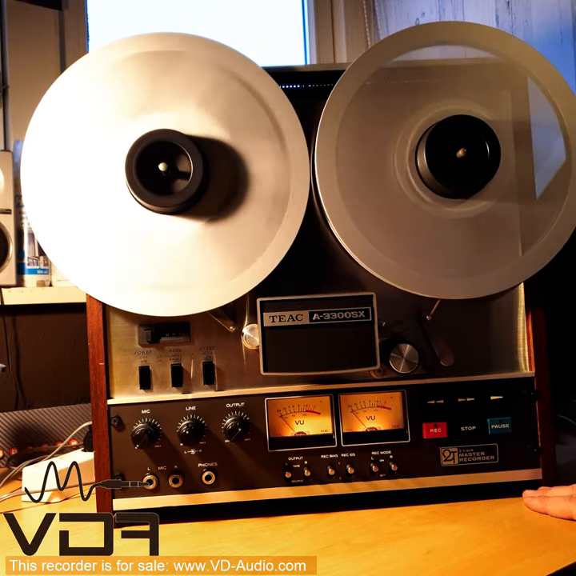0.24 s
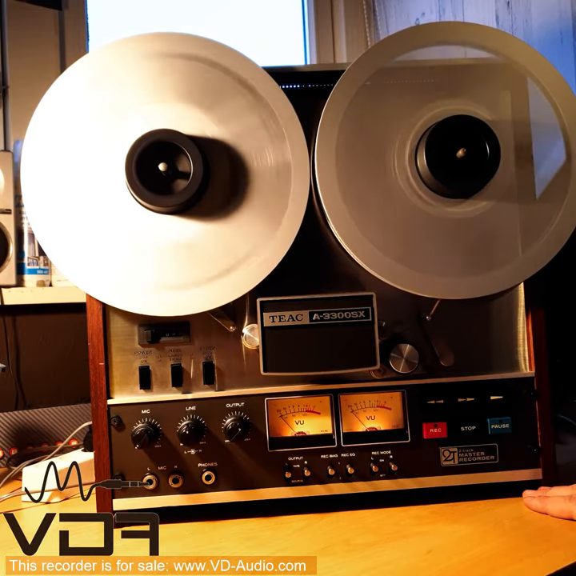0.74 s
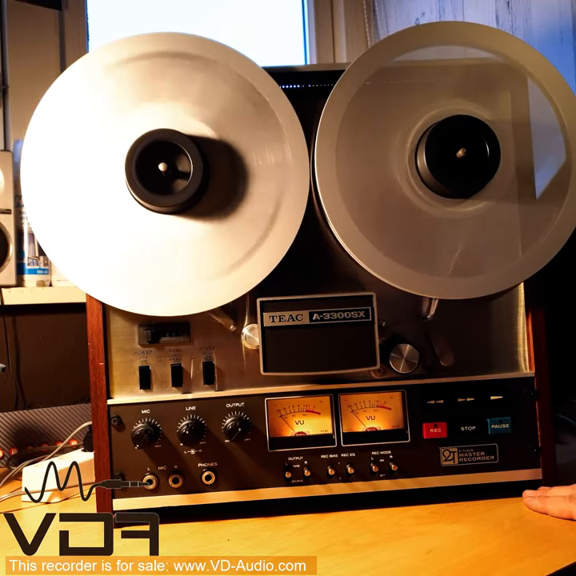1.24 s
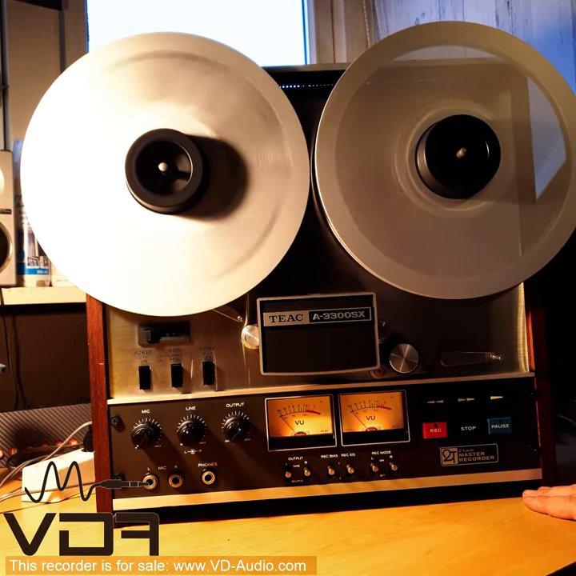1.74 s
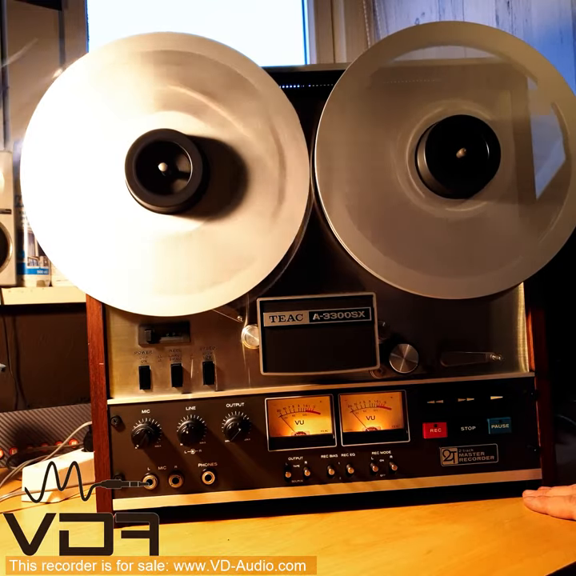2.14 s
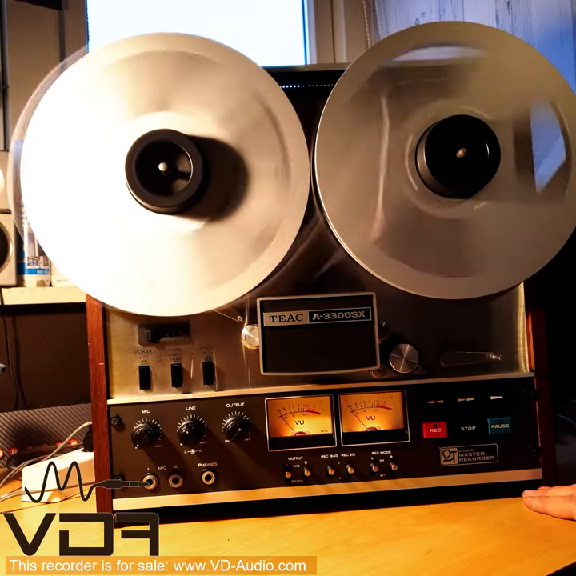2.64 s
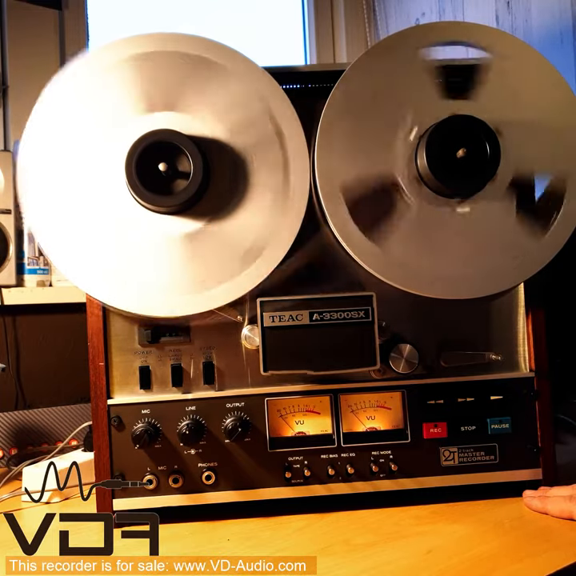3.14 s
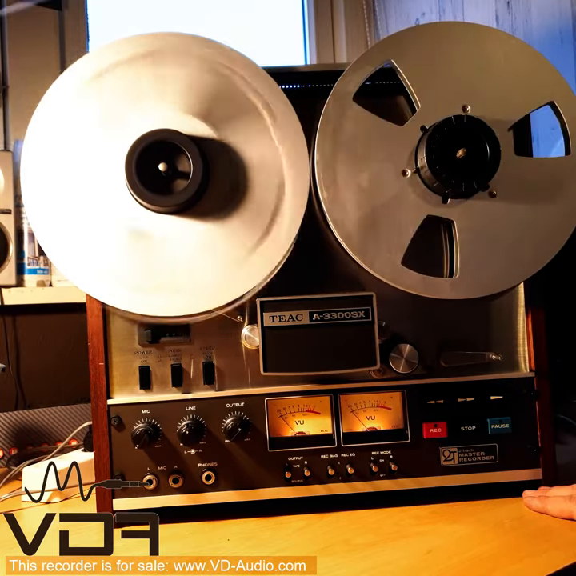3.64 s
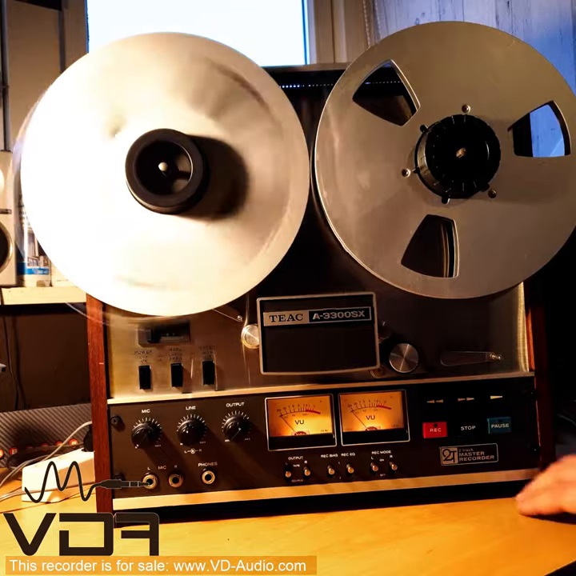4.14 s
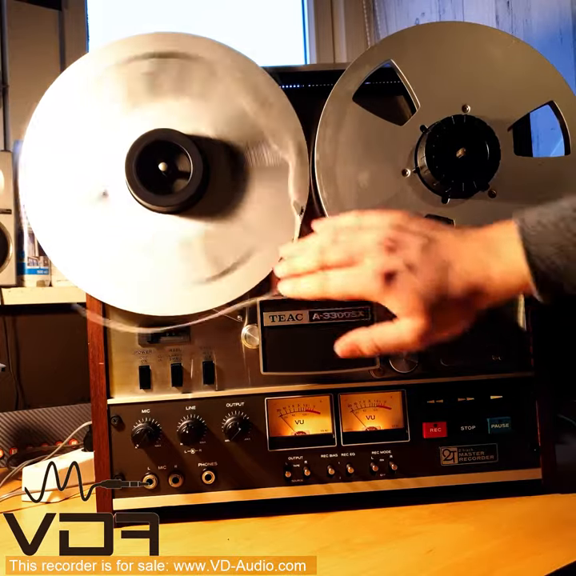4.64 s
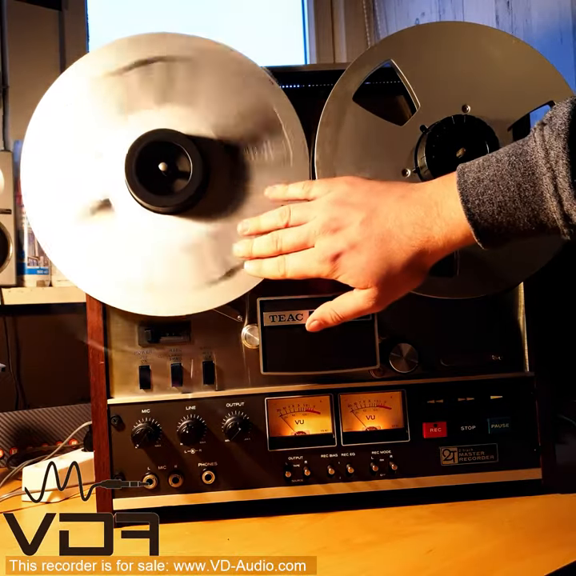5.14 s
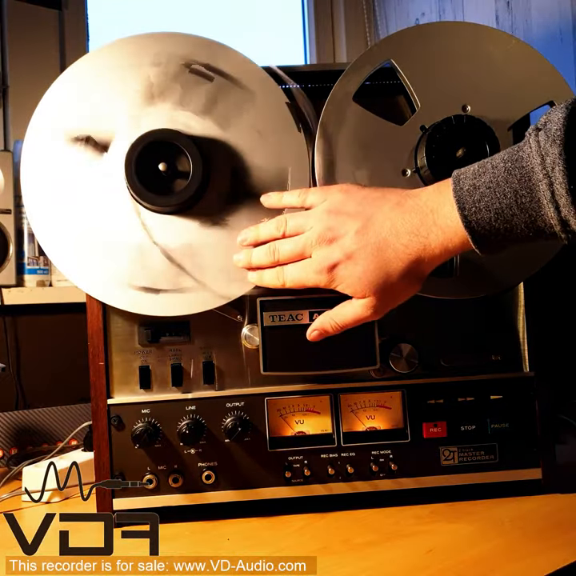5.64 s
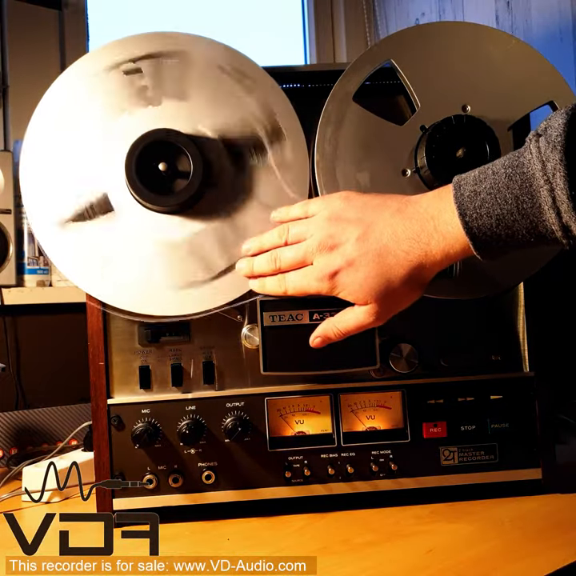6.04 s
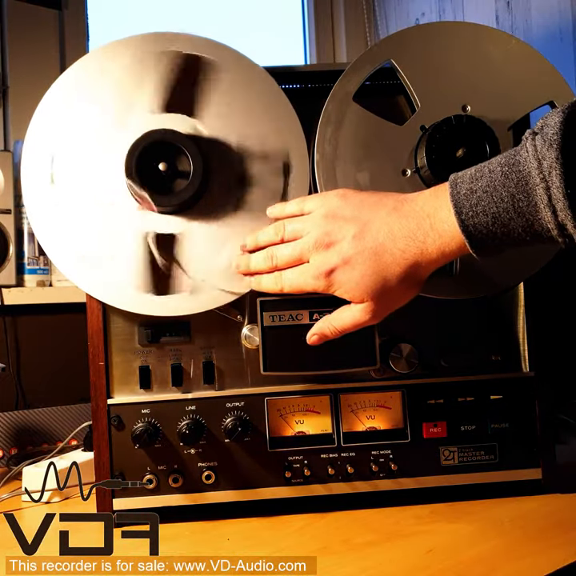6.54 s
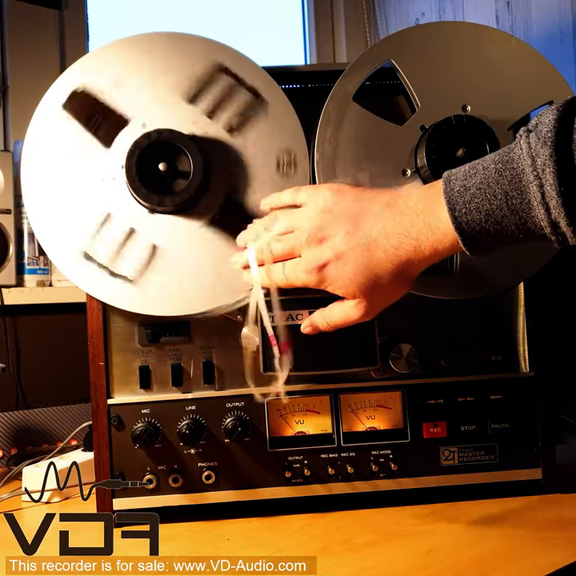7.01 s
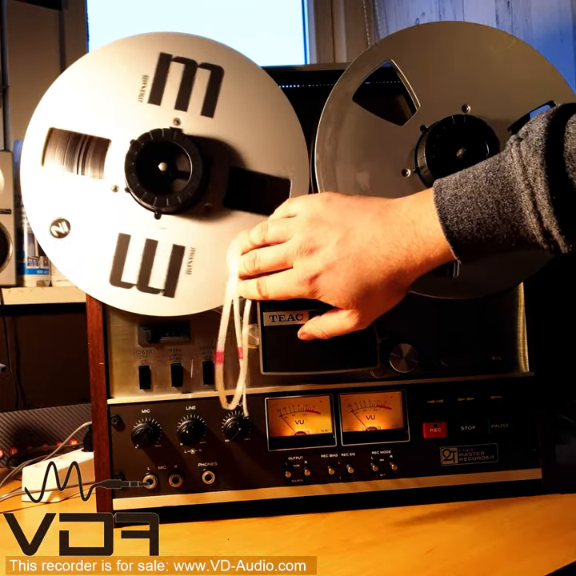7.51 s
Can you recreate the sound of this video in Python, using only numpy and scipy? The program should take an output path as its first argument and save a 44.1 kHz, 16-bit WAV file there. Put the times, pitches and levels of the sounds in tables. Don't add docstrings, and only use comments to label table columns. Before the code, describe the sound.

Close to the microphone in a small quiet room, a tape deck rewinds with a steady low motor hum, a mid-range bearing whirr and light tape hiss. Around 1.2 seconds the hiss swells, and at 1.3 the tape runs off: a rapid volley of bright, crackling plastic snaps, with short metallic clacks and hollow wooden thuds to about 1.75. The motor drops in pitch and fades by 2.5 while the case shudders; one especially hard, sharp crack lands at 2.04. From 2.5 to 4.6 the loose end flaps irregularly, in clusters of dry slaps, ticks and rustling swishes, with a faint ring from the reel and a low bump near 4.0. From about 5 softer pats come a few tenths of a second apart. Fingers hiss lightly on the rim from 5.4 to 7.6, with a faint rubbing, singing squeak near 6.5 and 7.5, then quiet room air.

```python
import sys
import numpy as np
from scipy import signal
from scipy.fft import rfft, irfft, next_fast_len
from scipy.io import wavfile
from scipy.ndimage import uniform_filter1d, map_coordinates

SR = 44100
rng = np.random.default_rng(int(sys.argv[2]) if len(sys.argv) > 2 else 0)


def undo_db(level):
    steps = np.asarray(level, float) / 20
    return 10 ** steps


def file_out(sig):
    cols = np.atleast_2d(sig).T
    lim = np.clip(cols, -1, 1)
    pcm = np.round(lim * 32767).astype(np.int16)
    wavfile.write(sys.argv[1], SR, pcm)


N = 342657
T = np.arange(N) / SR

# (time [s], bearing whirr level [dB], tape hiss level [dB])
DRIVE = [
    (0.0, -49, -58),
    (0.806, -49, -56.5),
    (1.3, -47.5, -46),
    (1.6, -48, -67.5),
    (2.0, -55.5, -67.5),
    (2.5, -70, -93),
    (3.0, -110, -110),
]
# (time [s], shaft rate [Hz], level [dB])
HUM = [
    (0, 64.45, -64),
    (1.3, 65.4, -63.5),
    (1.5, 63, -66.5),
    (1.8, 58.3, -61.5),
    (2.05, 55, -71),
    (2.4, 49.9, -89),
]
# (multiple of the shaft rate [1], level [dB])
SHAFT_ORDERS = [(1, 5), (2, 0), (5, -11.5), (8, -15.5)]
# (frequency [Hz], density [dB per Hz])
WHIRR = [(24, -37), (40, -0.5), (68, -7), (96, -9), (129, -10.5), (166, -14), (326, -10.5), (419, -14.5),
         (506, -13), (611, -11), (1600, -2.5), (3860, -22), (6000, -43), (7800, -59.5), (13200, -120)]
# (frequency [Hz], width [Hz], gain [dB])
CHASSIS = [(320, 44, 3), (517, 36, 4.5), (1170, 60, 1.5), (1290, 60, 1), (1440, 50, -4), (1527, 60, 0.5),
           (2090, 50, -8.5)]
# (frequency [Hz], density [dB per Hz])
TAPE_HISS = [(1760, -47.5), (3000, -13), (3820, -14.5), (4940, -11), (7010, -14.5), (13200, -4.5),
             (16000, -15), (16500, -41)]

# (frequency [Hz], density [dB per Hz])
AIR = [(15, -40), (28, -8.5), (50, -1), (97, -9), (154, -14), (208, -14.5), (389, -31.5), (422, -27.5),
       (457, -24.5), (787, -31), (12900, -40.5), (16500, -32.5)]
# (frequency [Hz], correlation [1])
ALIKE = [(100, 0.88), (300, 0.82), (600, 0.53), (2000, 0.13), (12000, 0.072)]
# (frequency [Hz], t60 [s])
ROOM = [(150, 0.65), (1000, 0.22), (5000, 0.28), (14000, 0.057)]

# (frequency [Hz], density [dB per Hz])
FIZZ = [(7000, -56), (9000, -5.5), (13000, -2), (15500, -4), (16600, -51)]
# (frequency [Hz], density [dB per Hz])
FILM = [(1470, -36.5), (2500, -14), (2830, -2.5), (3310, -9.5), (6180, 1), (9500, -5), (12400, -2.5),
        (20900, -120)]
# (frequency [Hz], density [dB per Hz])
PLATE = [(180, -39.5), (300, -11.5), (494, -20.5), (527, -20), (754, -4), (1430, -4), (1570, -2.5),
         (1960, 1), (4000, 0), (5200, -4), (8800, -120)]
# (frequency [Hz], width [Hz], gain [dB])
FLANGE = [(857, 89, 0.5), (1393, 160, 7), (1710, 16, 6), (2190, 94, 5.5), (2950, 150, 0.5), (3370, 46, 6),
          (4280, 62, 0.5), (6300, 120, 0.5), (7700, 1000, 3)]
ECHO_T60 = 0.17, 0.25, 0.3
# (time [s], peak [dB], plate [dB], fizz [dB], echo [dB])
LASHES = [(1.3144, -26.5, -16.5, -1, 2), (1.328, -31.5, -17.5, -0.5, 0), (1.339, -23, -22.5, 0.5, -1),
          (1.3447, -14.5, -22.5, 4, 2), (1.355, -14, -18.5, -0.5, -1), (1.3723, -14.5, -12, -5, 2),
          (1.375, -16.5, -12, -5, -3), (1.4575, -19, -15, 1.5, -4.5), (1.4598, -11.5, -19, 0, -5),
          (1.472, -28.5, -18, -4, -3), (1.529, -23.5, -15, -1, 4.5), (1.5409, -14, -8.5, 2, 1.5),
          (1.554, -16, -15, -3, -2), (1.571, -24, -10.5, -2.5, -1.5), (1.631, -21, -7, -3, 4.5),
          (1.6387, -18.5, -23, 1, -1.5), (1.738, -21, -3.5, 10, -5), (1.7515, -26, -13.5, 1, -1.5),
          (1.831, -30, -19, 3.5, 2), (1.856, -21, -5, 5.5, -4), (1.872, -29, -16, 2, -4.5),
          (1.998, -26, -10.5, -2.5, 4.5), (2.034, -23.5, -17, -2.5, 6), (2.0438, -7.5, -7.5, 1, -3),
          (2.263, -25, -19, -1.5, 0.5), (2.3032, -32.5, -9, -2.5, -0.5), (2.36, -30.5, -13, -0.5, -3)]
# (time [s], peak [dB], plate [dB], fizz [dB], echo [dB])
FLAPS = [(2.557, -21, -30, 0, 0), (2.573, -32.5, -25, -2, -1.5), (2.6178, -31.5, -6.5, 0.5, 0.5),
         (2.7306, -26, -13.5, -2.5, 0.5), (2.9179, -22, -13, 1.5, 1), (2.9548, -20.5, -15.5, 2.5, 4),
         (2.9742, -18, -9, 3, -1.5), (3.1323, -30, -14, -2.5, 1), (3.2152, -28, -11.5, 0, 0.5),
         (3.338, -21, -33, 2, 2.5), (3.347, -25, -15, 2.5, -3.5), (3.751, -26.5, -21, 7.5, 1),
         (3.759, -24.5, -16, 1, 1.5), (3.772, -27, -20, 0.5, -2), (3.799, -30.5, -12, 0.5, 1.5),
         (3.916, -37, -3.5, -2, -1), (3.9335, -26.5, -10.5, -2, -2), (3.9712, -32, -9, -0.5, 0.5),
         (4.0067, -26.5, -13, -0.5, 1), (4.021, -20.5, -18, -1, -2), (4.057, -24.5, -12, 1.5, 0.5),
         (4.061, -20.5, -21.5, 2, 0.5), (4.0922, -23, -12.5, 5, -1.5), (4.2575, -25.5, -15, -3.5, -1.5),
         (4.2922, -24.5, -14, -1.5, 0.5), (4.329, -26.5, -11.5, -2.5, -1), (4.484, -46, -23, 0, 2),
         (4.5803, -29, -18, -2.5, -3), (4.5806, -21.5, -20, 4, -3)]
# (time [s], peak [dB], plate [dB], fizz [dB], echo [dB])
PATS = [(4.973, -27.5, -22, 0, -0.4), (5.1787, -27.5, -17, 0.0077, -1), (5.389, -28, -18, 0, 0.15),
        (5.424, -28.5, -18, 0, -2), (5.6796, -23.5, -27, 0, 1), (5.705, -25.5, -29, 0, -0.22),
        (5.9236, -29, -15, 0, 0), (6.2623, -28, -17, 0, 0.32), (6.4707, -29.5, -18, 0, 0),
        (6.7912, -22.5, -10.5, 0.0024, -1.4), (7.1097, -31, -21, 0, -0.24), (7.1218, -46, -13, 0, -0.18),
        (7.3665, -31, -30, 0, 0), (7.522, -25, -32, 0, -1.6)]
# (time [s], peak [dB], plate [dB])
TICKS = [(1.113, -41.5, 1), (2.1804, -44.5, -10), (2.229, -34.5, -7), (2.335, -33.5, -12),
         (2.8737, -42.5, -5), (3.31, -41.5, -19), (3.378, -31.5, -5), (3.622, -43, -14), (3.652, -45, -14),
         (4.229, -45, -7), (4.2408, -40, -10), (4.274, -47, -6), (4.3986, -42, -9.5), (4.5034, -48.5, -27),
         (4.557, -61, -18), (4.593, -38.5, -14), (4.654, -37.5, -22), (4.715, -36, -15),
         (4.7525, -38.5, -10), (4.813, -44.5, -19), (4.891, -44, -12), (4.9628, -35.5, -8),
         (5.103, -45, -7.5), (5.136, -47, -7), (5.29, -68, -16), (5.346, -43.5, -20), (5.364, -40, -16),
         (5.496, -40, -11), (5.554, -45, -8.5), (5.625, -45.5, -6.5), (5.878, -43, -12), (5.985, -38, -16),
         (6.205, -38.5, -13), (6.235, -44.5, -8), (7.0695, -44.5, -13), (7.2, -45, -11), (7.279, -51, -18)]
# (time [s], level [dB], plate [dB], half length [s])
SWISHES = [(1.333, -34, -11.5, 0.02), (1.546, -35, -4, 0.014), (1.649, -33.5, -2, 0.029),
           (1.745, -26.5, -12.5, 0.02), (1.853, -31.5, -16, 0.017), (2.344, -44.5, -14, 0.018),
           (2.547, -40, -25, .007), (2.575, -39.5, -15, 0.029), (2.751, -43, -10.5, 0.019),
           (2.782, -52, -28, 0.0096), (2.95, -35, -13, 0.015), (3.339, -32, -12, 0.011),
           (3.633, -52, -8.5, 0.014), (3.764, -33, -8, 0.0081), (4.069, -41, -11, 0.0084),
           (4.096, -57.5, -18, 0.0072), (4.979, -57.5, -4, 0.017), (5.189, -53.5, -6.5, 0.018),
           (5.416, -43.5, -10.5, 0.016), (5.702, -54.5, -4, 0.025), (5.894, -51, -6, 0.019),
           (6.224, -48.5, -19, 0.011), (6.507, -41.5, -24.5, 0.026), (6.804, -42.5, -11.5, 0.02),
           (7.118, -62, -1, 0.015), (7.293, -49, -23, 0.02), (7.379, -45.5, -30, 0.035),
           (7.478, -45.5, -15, 0.04)]
# (time [s], level [dB])
DRAG = [(.95, -100), (1.05, -76), (1.15, -52.5), (1.3, -71), (1.95, -52.5), (2.41, -61.5), (2.85, -67.5),
        (3.3, -63.5), (3.48, -57), (3.59, -73.5), (3.75, -62.5), (3.93, -59.5), (4.21, -69), (4.52, -74.5),
        (4.7, -61.5), (4.86, -73), (5.07, -65.5), (5.33, -71), (5.8, -85)]
# (time [s], level [dB])
HAND = [(5.2, -84), (5.54, -56), (5.85, -55), (6.12, -51), (6.73, -49), (6.86, -51.5), (6.98, -60.5),
        (7.08, -52.5), (7.55, -59), (7.66, -71)]
# (time [s], left minus right [dB])
PLACE = [(1, -2), (2, -1.5), (3, -2), (4, -2), (4.6, -3.5), (5.5, -2.5), (6.5, -2.5), (7.7, -2)]
# (frequency [Hz], width [Hz], gain [dB])
REEL = [(852, 2.4, 1.5), (1444, 11, 3), (1770, 3, 5), (2210, 7.8, -3)]

# (time [s], peak [dB], edge [dB], panel pitch [Hz])
THUDS = [(1.306, -37, -18, 344), (1.344, -34, -6, 266), (1.632, -22.5, -2.5, 359.6), (1.66, -27, 2, 348.3),
         (1.685, -32.5, -20, 346), (1.911, -35, -6, 298), (1.981, -35.5, -5, 240), (2.187, -40, 5, 254),
         (2.301, -40.5, -16, 230), (2.359, -42, 5, 294), (2.487, -41, -0.5, 239), (2.537, -46, -4, 203),
         (2.602, -47, -25, 225), (2.869, -43, -4, 129), (2.94, -46.5, -30, 218), (3.02, -61, -20, 170),
         (3.332, -41, -22, 295), (3.398, -43.5, -1.5, 184), (3.757, -47.5, -5, 336), (3.843, -51, -5, 245),
         (4.024, -42, -28, 193), (4.054, -41.5, -24, 237), (4.088, -57, -21, 236), (4.633, -58, -18, 149),
         (4.706, -55.5, -29, 156), (6.08, -59.5, -30, 141)]
# (frequency [Hz], density [dB per Hz])
CASE = [(18, -53), (30, -25.5), (130, -4), (278, -4.5), (344, -8), (441, -7.5), (524, -3), (638, -14.5),
        (700, -2.5), (910, -30.5), (1540, -120)]
# (frequency [Hz], width [Hz], gain [dB])
PANELS = [(238, 14, 6.5), (334, 30, 2.5)]
# (time [s], level [dB], half length [s])
SHUDDER = [
    (1.76, -47.5, 0.26),
    (2.237, -52.5, 0.13),
    (2.6, -60.5, 0.14),
    (3.323, -70.5, 0.14),
    (4.127, -61, 0.11),
]
# (frequency [Hz], density [dB per Hz])
HOLLOW = [(50, -33), (130, -3.5), (235, 2), (330, -7.5), (550, -13), (1000, -62)]
# (time [s], peak [dB])
BUMPS = [
    (4.029, -45),
    (4.057, -53),
    (4.089, -50),
    (4.635, -58),
]

# (time [s], peak [dB])
TIPS = [(1.3458, -14.5), (1.3765, -19), (1.6405, -20), (1.738, -13.5), (1.74, -16), (2.045, -9),
        (2.559, -22.5), (2.9185, -25.5), (2.9755, -15), (3.3378, -18.5), (3.9347, -20.5), (5.18, -30.5),
        (5.4255, -31), (5.706, -27), (6.7919, -25)]
# (time [s], peak [dB], ring pitch [Hz], clack [dB])
KNOCKS = [(1.354, -21.5, 1290, 1.5), (1.376, -18, 1170, 2), (1.597, -18.5, 1390, -2),
          (1.613, -26.5, 2220, 9.5), (1.606, -29, 1360, 7), (1.631, -21.5, 1290, -1.5),
          (1.658, -23, 1500, -8.5), (1.671, -26.5, 680, 1), (1.718, -27.5, 1550, 4),
          (2.0443, -13.5, 1750, -10), (4.022, -30, 2170, -21), (4.581, -44.5, 880, -6),
          (4.891, -42.5, 3200, -17), (4.8905, -48, 2025, -19), (5.68, -47, 4370, -20),
          (5.705, -46, 4320, -20), (6.035, -56, 820, -10)]
# (time [s], level [dB])
GRIP = [(5.2, -92), (5.54, -65.5), (6.35, -75), (6.52, -54), (6.74, -63), (6.95, -94), (7.4, -58),
        (7.48, -44), (7.6, -77)]
# (frequency [Hz], width [Hz], gain [dB])
RIM = [(2234, 45, 2), (2830, 140, -4.5), (3200, 120, -4.5), (4390, 45, -0.5), (5270, 90, -3.5)]

HAND_FILM_DB, HAND_PLATE_DB, DRAG_PLATE_DB = -8, -23.5, -5
WHIP_DB, WHIP_FADE_S, WHIP_START_S = 6.5, 0.42, 1.17
TICK_ECHO_DB, SLAP_ECHO_DB = -7.5, -12
STILL_S, COVERED_S, MUTED_DB = 3.3, 4.05, -10.5
ARM_T60 = 0.019
BOOM_DB = -25.5
SWELL_SHARE = 0.9
AIR_DB = -74.5


def unit(x):
    return x / np.sqrt(np.mean(x ** 2) + 1e-20)


def along(points, hz):
    f, v = np.transpose(points)
    return np.interp(np.log(hz + 1), np.log(f + 1), v)


def curves(rows, outside=None):
    s, *cols = np.transpose(rows)
    return [np.interp(T, s, c, outside, outside) for c in cols]


def wobble(rate):
    return map_coordinates(rng.standard_normal(int(N * rate / SR) + 4), [T * rate])


def filtered(x, response):
    m = next_fast_len(N + SR // 4)
    return irfft(rfft(x, m) * response(np.fft.rfftfreq(m, 1 / SR)), m)[..., :N]


def narrow(x, peaks):
    def response(f):
        total = 0
        for k, (c, w, db) in enumerate(peaks):
            total = total + (-1) ** k * undo_db(db) * 1j * f * w / (c * c - f * f + 1j * f * w)
        return total
    return filtered(x, response)


def rush(spectrum, patchy_db, peaks=()):
    z = signal.stft(rng.standard_normal((2, N)), nperseg=256)[2]
    field = uniform_filter1d(rng.standard_normal(z.shape[1:]), size=3, axis=0)
    field = uniform_filter1d(field, size=16, axis=1)
    pair = signal.istft(z * undo_db(patchy_db * unit(field)), nperseg=256)[1][:, :N]

    def mid_side(hz):
        bumps = sum(db / (1 + (2 * (hz - c) / w) ** 2) for c, w, db in peaks)
        turn = np.arccos(np.clip(along(ALIKE, hz), -1, 1)) / 2
        return undo_db(along(spectrum, hz) + bumps) * [np.cos(turn), np.sin(turn)]

    mid, side = filtered(pair, mid_side)
    return unit(np.array([np.roll(mid + side, shift=3), mid - side]))


def bursts(times, db, t60, rise):
    power, t = np.zeros(N + SR), np.arange(SR // 4) / SR
    for s, level, life in zip(times, db, t60):
        blow = undo_db(level - 60 * t / max(life, .003)) * (1 - np.exp(-t / rise))
        power[round(s * SR):][:len(t)] += blow ** 2
    return np.sqrt(power[:N])


def humps(times, db, half):
    power = np.zeros(N)
    for s, level, h in zip(times, db, half):
        near = slice(max(0, round((s - 4 * h) * SR)), round((s + 4 * h) * SR))
        spread = np.where(T[near] < s, SWELL_SHARE * h, h)
        power[near] += undo_db(2 * level) * np.exp(-((T[near] - s) / spread) ** 2)
    return np.sqrt(power)


def lingering(envelope, t60):
    keep = undo_db(-120 / (t60 * SR))
    return np.sqrt(np.abs(signal.lfilter([1 - keep], [1, -keep], envelope ** 2)))


def sides(lr_db):
    return undo_db(np.array([lr_db / 2, -lr_db / 2]))


def motors():
    shaft_hz, hum_db = curves(HUM)
    turns = np.cumsum(shaft_hz * (1 + 0.0027 * wobble(15))) / SR
    hum = sum(undo_db(db + 0.7 * wobble(10)) * np.sin(2 * np.pi * k * turns) for k, db in SHAFT_ORDERS)
    whirr_db, hiss_db = curves(DRIVE)
    whirr = undo_db(whirr_db + 2.5 + 0.24 * wobble(5.5)) * rush(WHIRR, patchy_db=1.0, peaks=CHASSIS)
    hiss = undo_db(hiss_db + 2.0) * rush(TAPE_HISS, patchy_db=2.0)
    return sides(np.array([-3.3])) * (undo_db(hum_db + 7.0) * hum + whirr + hiss)


def room_floor():
    return undo_db(AIR_DB + 5.0) * rush(AIR, patchy_db=1.1)


def contacts():
    slaps = [(*row, SLAP_ECHO_DB + echo_db) for *row, echo_db in LASHES + FLAPS + PATS]
    touches = [(*row, 0, TICK_ECHO_DB) for row in TICKS]
    return np.transpose(slaps + touches)


def strikes(spectrum, snap_db, swish_db, drag, t60, rough_db):
    s, echo_db = contacts()[[0, -1]]
    swish_s, _, _, half = np.transpose(SWISHES)
    life = np.full(len(s), .013)
    cracks = bursts(s, snap_db + 4, life, rise=0.0014)
    strokes = humps(swish_s, swish_db, half) + drag
    direct = (cracks + strokes * unit(undo_db(rough_db))) * rush(spectrum, patchy_db=4.0, peaks=FLANGE)
    echo_source = bursts(s, snap_db + echo_db + 17.5, life, rise=0.0014) + undo_db(2.0) * strokes
    return direct + lingering(echo_source, t60) * rush(spectrum, patchy_db=3.5, peaks=FLANGE)


def tape_end():
    _, db, plate_db, fizz_db, _ = contacts()
    _, swish_db, scrape_db, _ = np.transpose(SWISHES)
    drag, hand = undo_db(curves(DRAG)[0]), undo_db(curves(HAND, outside=-110)[0])
    film_drag = np.hypot(drag, undo_db(HAND_FILM_DB) * hand)
    plate_drag = np.hypot(undo_db(DRAG_PLATE_DB) * drag, undo_db(HAND_PLATE_DB) * hand)
    fizz_drag = undo_db(-5.0) * np.hypot(drag, hand)
    flutter = wobble(60) + 1.5 * wobble(500)
    fizz_t60, film_t60, plate_t60 = ECHO_T60
    fizz = strikes(FIZZ, db + fizz_db - 5.5, swish_db - 9.0, fizz_drag, fizz_t60, rough_db=0.78 * flutter)
    film = strikes(FILM, db - 5.0, swish_db - 7.0, film_drag, film_t60, rough_db=3.1 * flutter)
    plate = strikes(PLATE, db + plate_db, swish_db + scrape_db + 1.0, plate_drag, plate_t60,
                    rough_db=2.8 * flutter)
    whip_db = WHIP_DB * np.exp(-np.abs(T - WHIP_START_S) / WHIP_FADE_S)
    return sides(curves(PLACE)[0]) * (undo_db(whip_db) * fizz + film + plate)


def reel_ring(tape):
    free = (T > STILL_S) & (T < COVERED_S)
    return undo_db(6.0) * narrow(tape * np.where(free, 1, undo_db(MUTED_DB)), REEL)


def case():
    s, db, edge_db, panel_hz = np.transpose(THUDS)
    s = s + 0.00501
    thuds = bursts(s, db - 4.0, np.full(len(s), .07), rise=0.0013)
    thuds = np.hypot(thuds, undo_db(1.0) * lingering(thuds, 0.44)) * rush(CASE, patchy_db=-2.0, peaks=PANELS)

    panel, t = np.zeros(N), np.arange(SR // 5) / SR
    for start, level, hz in zip(s, db, panel_hz):
        envelope = undo_db(level - 6.5 - 60 * t / 0.22) * (1 - np.exp(-t / 0.002))
        panel[round(start * SR):][:len(t)] += envelope * np.sin(2 * np.pi * hz * t)

    blows = np.bincount(np.round((s + 0.0019) * SR).astype(int), undo_db(db + edge_db + 35.0), N)

    def knock(f):
        return 1j * f * 500 / (650 ** 2 - f * f + 1j * f * 500) / (1 + 1j * f / 1500) ** 4

    edges = filtered(blows, knock)

    jolt_s, jolt_db = np.hstack([[s, db + BOOM_DB], np.transpose(BUMPS)])
    table = [(25, -38.5), (50, -5.5), (110, -6.5), (180, -26.0), (400, -85)]  # (Hz, dB per Hz)
    booms = bursts(jolt_s, jolt_db + 2.0, np.full(len(jolt_s), .22), rise=0.0061)
    booms = booms * rush(table, patchy_db=1.0)

    shudder = humps(*np.transpose(SHUDDER)) * undo_db(-1.0 + 1.3 * wobble(25)) * rush(HOLLOW, patchy_db=2.5)
    return sides(np.array([-2.5])) * (thuds + panel + edges + booms + shudder)


def whip_cracks():
    s, db = np.transpose(TIPS)
    pulse = bursts(s, db + 4.5, np.full(len(s), .006), rise=0.0004) * rush(FIZZ, patchy_db=-2.0)[1]
    return sides(np.array([-3.5])) * np.array([np.roll(pulse, shift=3), pulse])


def arms():
    s, db, _, clack_db = np.transpose(KNOCKS)
    metal = [(600, -53.0), (1100, -3.0), (2600, -5.0), (4500, -57.5)]  # (Hz, dB per Hz)
    clacks = bursts(s - .001, db + clack_db, np.full(len(s), 0.86 * ARM_T60), rise=0.0012)
    clacks = clacks * rush(metal, patchy_db=6.0)
    ring, t = np.zeros(N + SR), np.arange(SR // 5) / SR
    for start, level, hz, _ in KNOCKS:
        decay = undo_db(level + 1.5 - 60 * t / ARM_T60)
        ring[round(start * SR):][:len(t)] += decay * np.sin(2 * np.pi * hz * t)
    ring = ring[:N]
    return clacks + np.array([undo_db(-6.5) * np.roll(ring, shift=4), ring])


def room(x):
    hz, t, z = signal.stft(rng.standard_normal((2, SR // 2)), SR, nperseg=128)
    tail = signal.istft(z * undo_db(-60 * t / along(ROOM, hz)[:, None]), SR, nperseg=128)[1]
    tail = np.pad(tail, ((0, 0), (130, 0))) / np.linalg.norm(tail[0])
    return signal.fftconvolve(x.mean(axis=0)[None], tail, axes=1)[:, :N]


def rim():
    grip = undo_db(curves(GRIP, outside=-110)[0] + 2.5 * wobble(120))
    return undo_db(14.5) * narrow(grip * rng.standard_normal((2, N)), RIM)


def scene():
    deck = motors() + room_floor()
    tape = tape_end()
    loose_end = tape + reel_ring(tape) + whip_cracks()
    metal = arms()
    return deck + loose_end + case() + metal + undo_db(-5.5) * room(metal) + rim()


def top_cut(x):
    return signal.sosfilt(signal.butter(12, 16800, fs=SR, output="sos"), x)


def record(dry):
    def microphone(hz):
        bass_cut = (1j * hz / 42) ** 3 / (1 + 1j * hz / 42) ** 3
        return bass_cut * undo_db(-24 * (hz > 15900))

    return top_cut(filtered(dry, microphone))


dry = scene()
out = record(dry)
file_out(out)
```